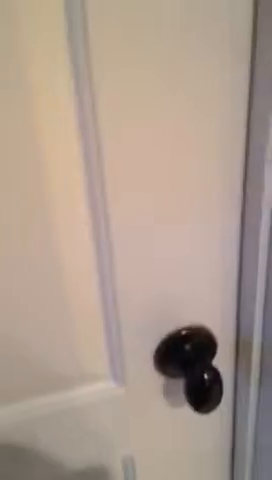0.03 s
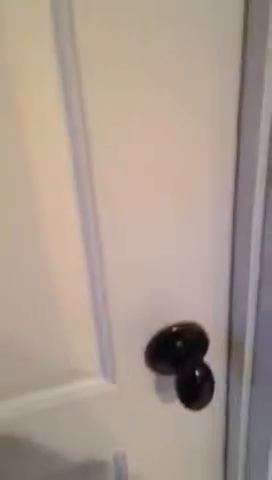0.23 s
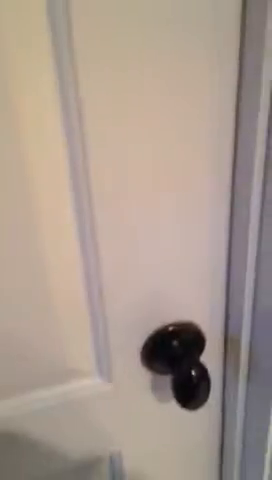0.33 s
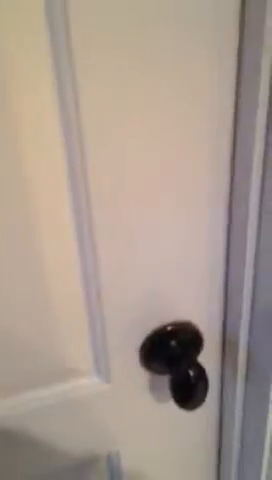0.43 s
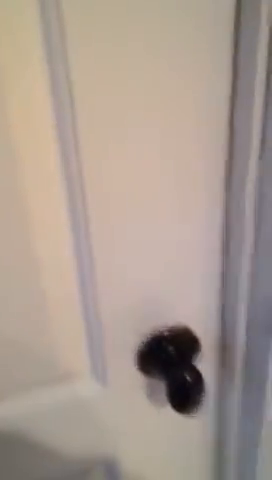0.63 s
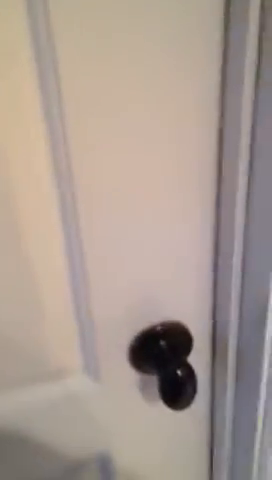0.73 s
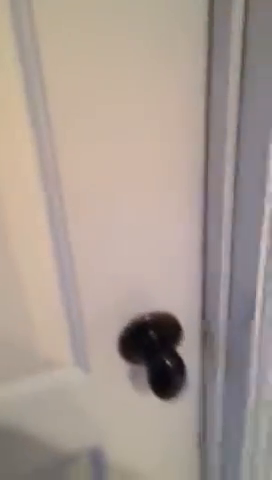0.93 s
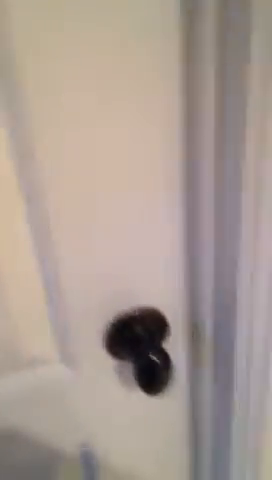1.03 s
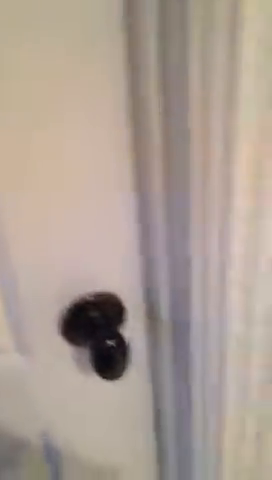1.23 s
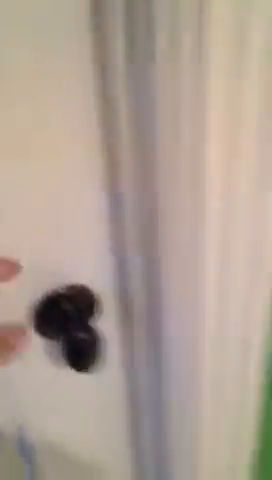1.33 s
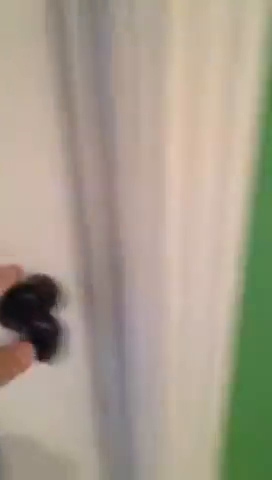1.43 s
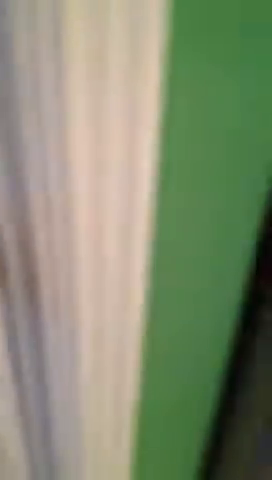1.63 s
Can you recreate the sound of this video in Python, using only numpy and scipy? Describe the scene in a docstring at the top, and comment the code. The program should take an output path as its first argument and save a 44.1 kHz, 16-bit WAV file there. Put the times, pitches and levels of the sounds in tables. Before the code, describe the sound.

Knuckles knock four times on a closed wooden door, each dull knock followed by a small rattle of the latch. Two soft bumps follow, then low room noise and thin hiss, heard close by in a small room.

```python
"""A small room, one microphone near a closed wooden door, low room noise and thin hiss throughout.
Knuckles knock once: a tap and a dull push of the panel, echoes off nearby walls, the ring of the door's
low modes, and a moment later a rattle in the latch. A lighter touch leads into three more such knocks.
Two soft double bumps follow, and the room's tail dies away into the noise."""
import sys
import numpy as np
from scipy import signal
from scipy.fft import rfft, irfft
from scipy.io import wavfile

SR = 44100
rng = np.random.default_rng(int(sys.argv[2]) if len(sys.argv) > 2 else 0)


def dump(signal):
    """Clip the signal to [-1, 1] and save it as 16-bit WAV at the path in sys.argv[1]."""
    limited = np.clip(np.atleast_2d(signal).T, -1, 1)
    pcm = np.round(limited * 32767).astype(np.int16)
    wavfile.write(sys.argv[1], SR, pcm)


N = 74970
TIME, FREQS = np.arange(N) / SR, np.arange(N // 2 + 1) * SR / N

# steady low noise of the room: (frequency [Hz], relative level [dB])
ROOM_TONE_SPECTRUM = [(25, -45), (60, -27.5), (100, -15.5), (130, -5), (170, -1), (240, -1.5), (320, -7.5),
                      (400, -6.5), (520, -8), (650, -13.5), (780, -14), (1100, -21.5), (2000, -24)]
# the microphone's own hiss: (frequency [Hz], relative level [dB])
HISS_SPECTRUM = [(2000, 1), (3500, -1), (5500, -3.5), (7000, -4), (8500, -9), (9800, -13.5), (11500, -7.5),
                 (13500, -3.5), (15300, -4)]
# colour of the room's tail: (frequency [Hz], relative level [dB])
TAIL_SPECTRUM = [(50, -7.5), (130, 2.5), (250, 0), (450, 0), (700, 1), (1200, -1), (3000, -3.5), (8000, -1)]
# decay of the room's tail: (frequency [Hz], t60 [s])
TAIL_DECAY = [(60, 0.75), (160, 0.56), (420, 0.39), (1100, 0.47), (4000, 0.29), (10000, 0.32)]
# echoes off the nearest surfaces: (delay [s], level [dB])
WALL_ECHOES = [(.00687, -6.5), (0.0094, -16), (.01448, -12.5), (.02228, -8), (0.0328, -15.5)]
# the door rattles in its latch: (time [s], clack level [dB], metal ring level [dB])
LATCH_RATTLES = [(0.2449, -44, -60), (0.251, -50, -43.5), (0.2907, -55, -58), (0.4275, -67, -78),
                 (0.4633, -50, -50), (0.4686, -52.5, -51.5), (0.5367, -67.5, -63), (0.6670, -58, -66),
                 (0.6718, -50, -60), (0.6770, -50, -54), (0.8679, -44, -68), (0.8825, -56.5, -61),
                 (0.918, -57.5, -52.5)]
# clack of the latch: (frequency [Hz], relative level [dB])
CLACK_SPECTRUM = [(300, -18), (750, 18), (1100, 8.5), (1900, 0), (2800, 2), (4500, -1.5), (5800, -11),
                  (7200, -11), (9000, -27), (15000, -30)]
# modes of the latch and its plate: (frequency [Hz], level [dB], t60 [s])
LATCH_MODES = [(1316, -3.5, 0.046), (1580, -11.5, 0.09), (2165, -23, 0.14), (2473, -17, 0.09),
               (3180, -11.5, 0.044), (4080, -16, 0.031), (4940, -13, 0.024), (6535, -20.5, 0.045)]
# tap of the knuckle: (frequency [Hz], relative level [dB])
TAP_SPECTRUM = [(300, -3), (650, -3), (920, 0.5), (1100, -12), (1400, -25), (2200, -48), (7000, -34.5),
                (12000, -58.5)]
# modes of the door panel: (frequency [Hz], level [dB], t60 [s])
DOOR_MODES = [(51.5, -34, 0.36), (76.9, -27.5, 0.38), (126.9, -19, 0.28), (154.05, -20, 0.43),
              (171.56, -20, 0.38), (239.1, -15.5, .32), (282, -21, 0.19), (334.5, -16, .1),
              (386, -21.5, .24), (393.6, -18, 0.19), (429.5, -11.5, 0.079), (462, -29.5, 0.23),
              (497.3, -13, 0.16), (556, -23.5, 0.15)]
# soft, padded bumps against the door: (time [s], level [dB], contact [ms])
SOFT_BUMPS = [(0.396, -31, 1.8), (0.4250, -34.5, 1.15), (1.0730, -45.5, 1.54), (1.0959, -43.5, 2.23),
              (1.563, -49, 1.44), (1.5830, -51.5, 1.33)]
# knuckles meet the door: (time [s], level [dB], contact [ms], tap level [dB])
KNUCKLE_KNOCKS = [(0.2110, -17, 1.19, -48), (0.375, -27, 1.33, -49), (0.4302, -17.4, 1.153, -45.5),
                  (0.637, -18, 1.166, -43.5), (0.8511, -19, 1.163, -46)]
# every push on the panel, knock or bump: (time [s], level [dB], contact [ms])
BLOWS = [knock[:3] for knock in KNUCKLE_KNOCKS] + list(SOFT_BUMPS)

LOW_CUT_HZ, HIGH_CUT_HZ = 28, 15400


def from_db(db):
    """Decibels to gain."""
    return 10 ** (np.asarray(db) / 20)


def at_hz(points, hz):
    """Read a table on a log-frequency axis."""
    table_hz, values = np.transpose(points)
    return np.interp(np.log(np.maximum(hz, 1)), np.log(table_hz), values)


def rising(rise_s):
    """A gain that swells smoothly from nothing in about rise_s seconds."""
    return 1 - np.exp(-(TIME / rise_s) ** 2)


def dying(t60):
    """A gain that falls by 60 dB in t60 seconds."""
    return np.exp(-np.log(1000) * TIME / t60)


def later(x, delay_s):
    """The same sound, delay_s seconds later."""
    return np.interp(TIME - delay_s, TIME, x, left=0)


def noise(spectrum, low_hz=0, high_hz=SR):
    """Steady noise of the given colour between two edges; rms 1."""
    white = rfft(rng.standard_normal(N))
    in_band = (FREQS >= low_hz) & (FREQS < high_hz)
    coloured = irfft(white * from_db(at_hz(spectrum, FREQS)) * in_band, N)
    return coloured / coloured.std()


def burst(spectrum, rise_s, t60):
    """Many close modes struck at once: coloured noise that swells and dies."""
    return noise(spectrum) * rising(rise_s) * dying(t60)


def ring(modes, scatter_db=0.57):
    """Struck modes; every blow shares its strength a little differently among them."""
    out = 0
    for hz, db, t60 in modes:
        gain = from_db(db + scatter_db * rng.standard_normal())
        out += gain * dying(t60) * np.sin(2 * np.pi * hz * TIME)
    return out


def background(room_db=-63.5, hiss_db=-75, split_hz=2000):
    """Low room noise under the microphone's thin hiss."""
    room_tone = from_db(room_db) * noise(ROOM_TONE_SPECTRUM, high_hz=split_hz)
    hiss = from_db(hiss_db) * noise(HISS_SPECTRUM, low_hz=split_hz, high_hz=HIGH_CUT_HZ)
    return room_tone + hiss


def room_tail(direct, level_db=-9.5):
    """The small room's diffuse tail builds up quickly and dies at its own rate in each octave."""
    spectrum = rfft(noise(TAIL_SPECTRUM))
    tail = 0
    for low_hz in 30 * 2. ** np.arange(10):
        octave = irfft(spectrum * (FREQS >= low_hz) * (FREQS < 2 * low_hz), N)
        tail += octave * dying(at_hz(TAIL_DECAY, low_hz * np.sqrt(2)))
    tail *= rising(rise_s=0.016)
    return from_db(level_db) * signal.fftconvolve(direct, tail / np.linalg.norm(tail))[:N]


def wall_echoes(direct):
    """Echoes off the nearest surfaces reach the microphone just behind the direct sound."""
    return sum(from_db(db) * later(direct, delay_s) for delay_s, db in WALL_ECHOES)


def latch_rattles(rise_s=0.00066):
    """The door swings back on its latch: a short clack and a few metal modes."""
    out = 0
    for time_s, clack_db, metal_db in LATCH_RATTLES:
        clack = from_db(clack_db) * burst(CLACK_SPECTRUM, rise_s, t60=0.058)
        metal = from_db(metal_db) * ring(LATCH_MODES) * rising(rise_s)
        out += later(clack + metal, time_s)
    return out


def knuckle_taps(lead_s=0.003):
    """The short tap of bone on wood, starting just ahead of each knock's peak."""
    out = 0
    for time_s, _, _, tap_db in KNUCKLE_KNOCKS:
        tap = burst(TAP_SPECTRUM, rise_s=0.0005, t60=0.11)
        out += from_db(tap_db) * later(tap, time_s - lead_s)
    return out


def panel_ring(trim_db=-1, usual_contact_ms=1.21, lead_s=0.00055):
    """Each push rings the door's modes; a longer contact leaves the upper ones quieter."""
    swell = rising(rise_s=0.0033)   # the bending wave crosses the panel
    out = 0
    for time_s, db, contact_ms in BLOWS:
        # a bell-shaped push has a bell-shaped spectrum: the loss in dB grows with frequency squared
        softness = 20 * np.log10(np.e) * (np.pi / 1000) ** 2 * (contact_ms ** 2 - usual_contact_ms ** 2)
        modes = [(hz, mode_db - softness * hz ** 2, t60) for hz, mode_db, t60 in DOOR_MODES]
        impulse = from_db(db + trim_db) * contact_ms / usual_contact_ms
        out += impulse * later(ring(modes) * swell, time_s - lead_s)
    return out


def panel_thuds():
    """Each bell-shaped push on the panel radiates its second derivative straight to the microphone."""
    out = 0
    for time_s, db, contact_ms in BLOWS:
        from_peak = (TIME - time_s) * 1000 / contact_ms
        bell = np.exp(-from_peak ** 2)
        out += from_db(db) * (1 - 2 * from_peak ** 2) * bell
    return out


def scene():
    """At the microphone, in mono: the sharp sounds stir the room's tail; the panel rings on beside it."""
    thuds = panel_thuds()
    strikes = thuds + wall_echoes(thuds) + knuckle_taps() + latch_rattles()
    return (strikes + room_tail(strikes) + panel_ring() + background())[None]


def record(dry):
    """The microphone loses the deepest bass; the top is cut steeply."""
    low_cut = signal.butter(2, LOW_CUT_HZ, "high", fs=SR, output="sos")
    high_cut = signal.ellip(12, rp=0.1, rs=70, Wn=HIGH_CUT_HZ, fs=SR, output="sos")
    return signal.sosfilt(high_cut, signal.sosfilt(low_cut, dry))


dry = scene()
out = record(dry)
dump(out)
```